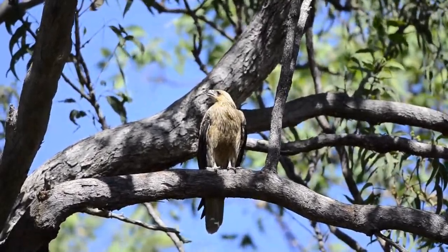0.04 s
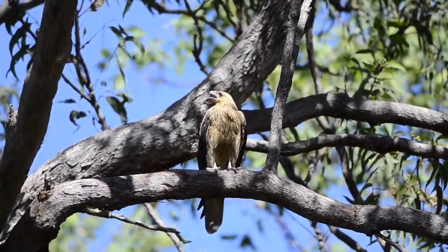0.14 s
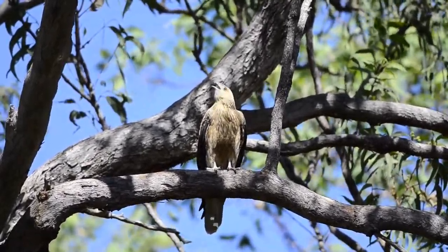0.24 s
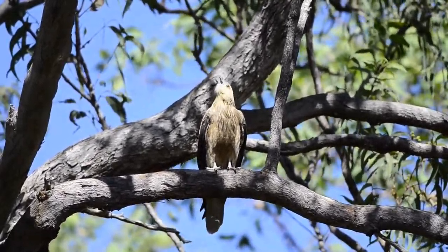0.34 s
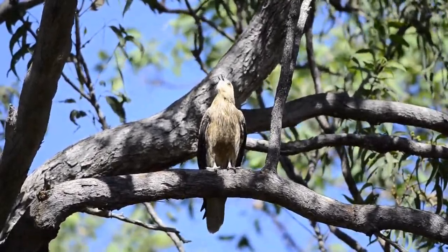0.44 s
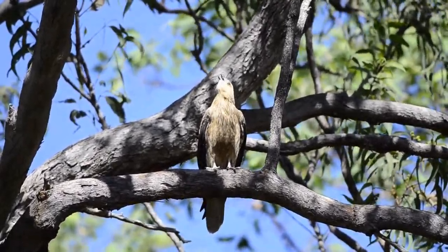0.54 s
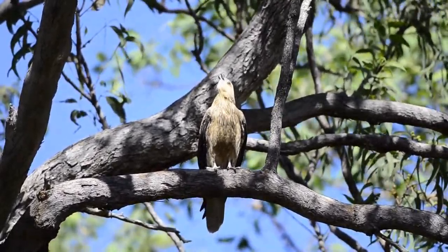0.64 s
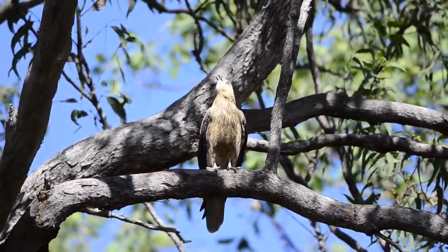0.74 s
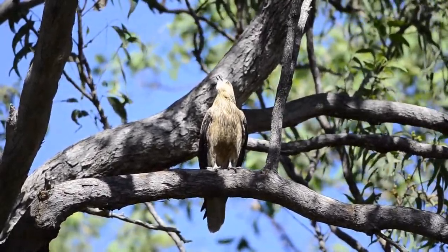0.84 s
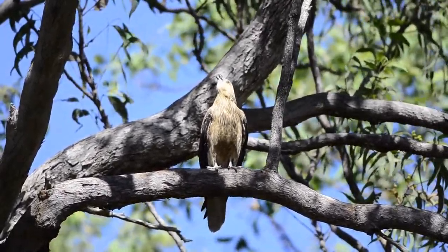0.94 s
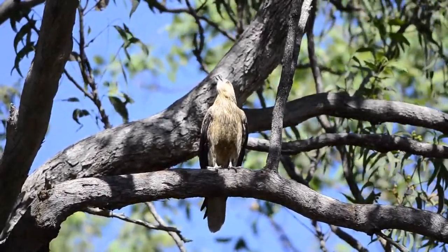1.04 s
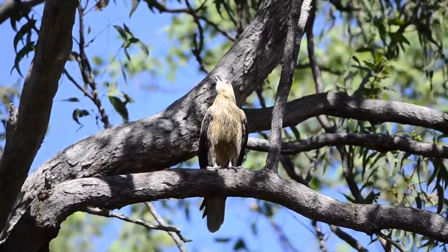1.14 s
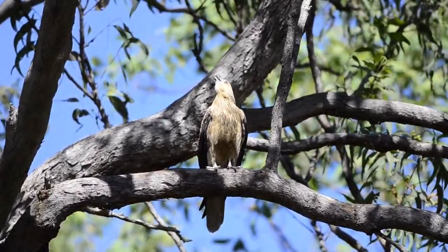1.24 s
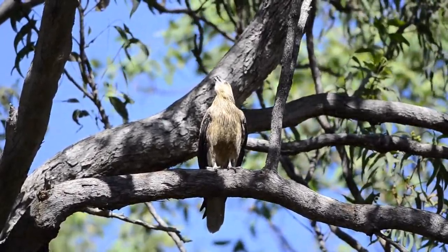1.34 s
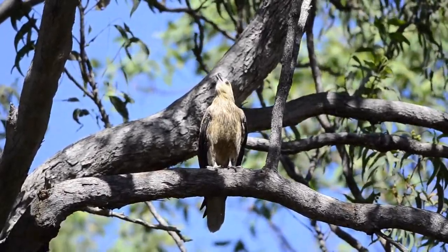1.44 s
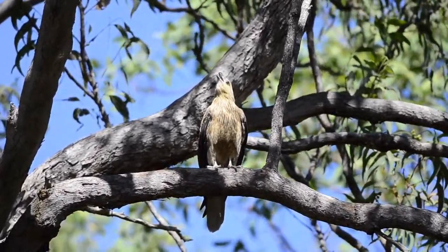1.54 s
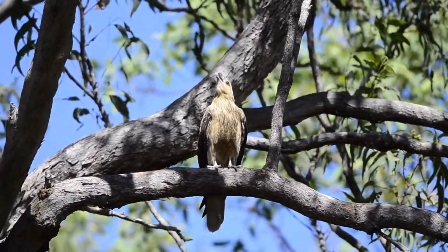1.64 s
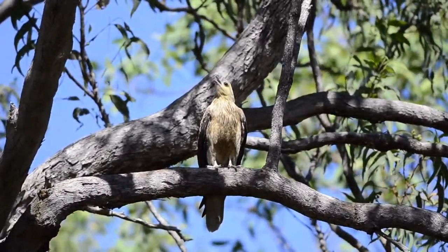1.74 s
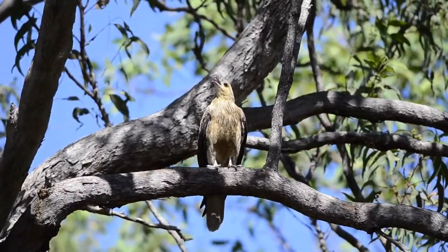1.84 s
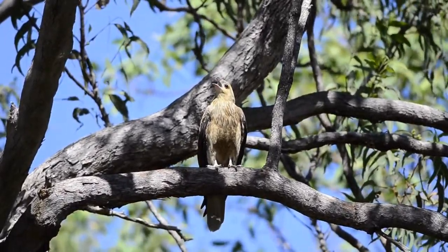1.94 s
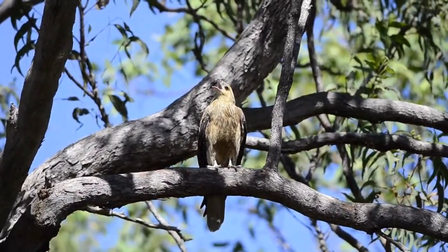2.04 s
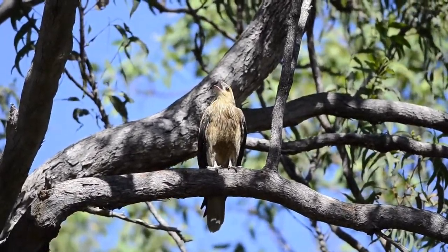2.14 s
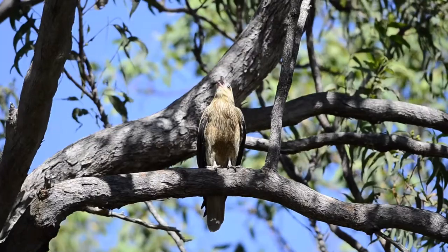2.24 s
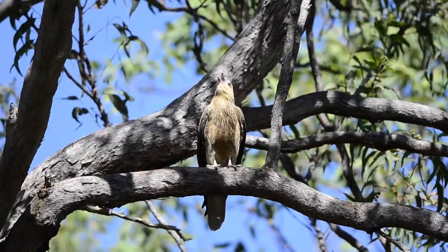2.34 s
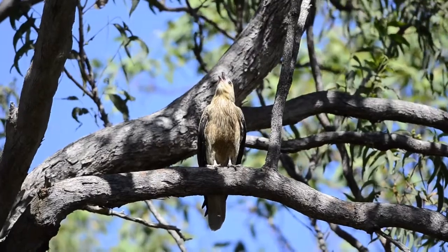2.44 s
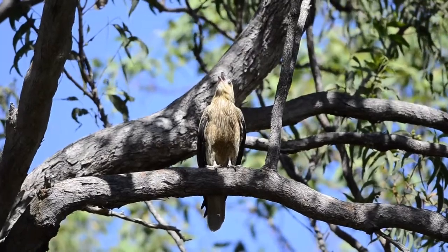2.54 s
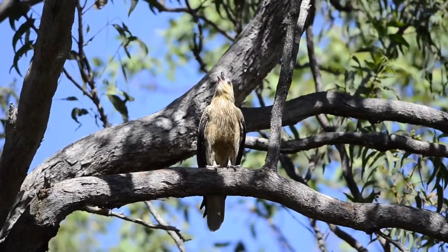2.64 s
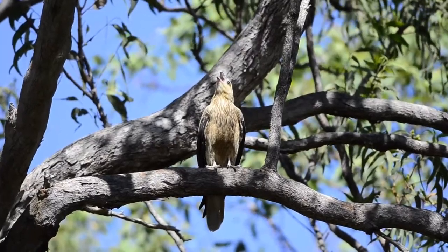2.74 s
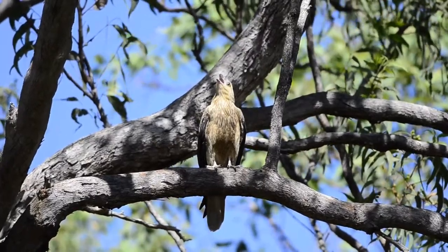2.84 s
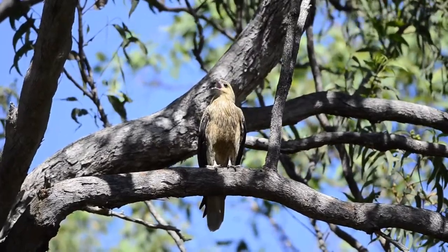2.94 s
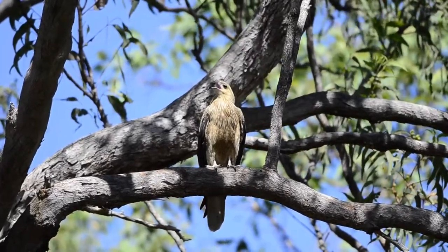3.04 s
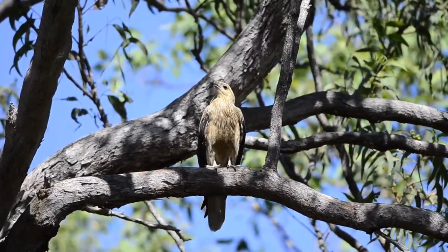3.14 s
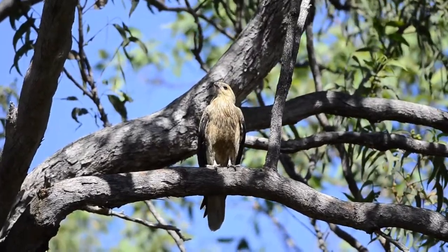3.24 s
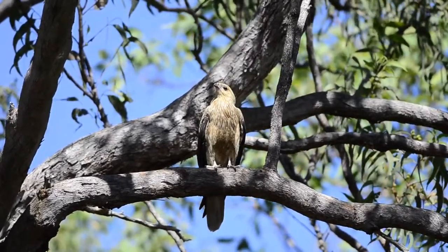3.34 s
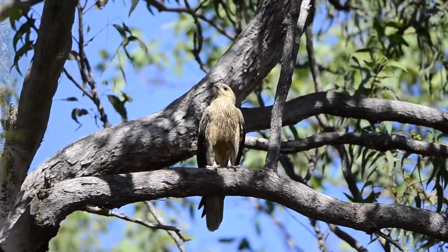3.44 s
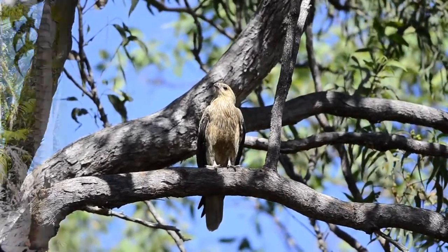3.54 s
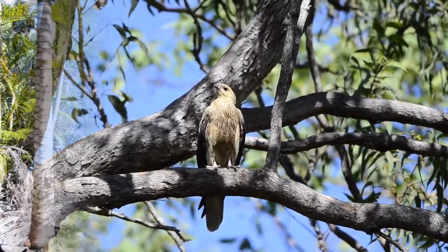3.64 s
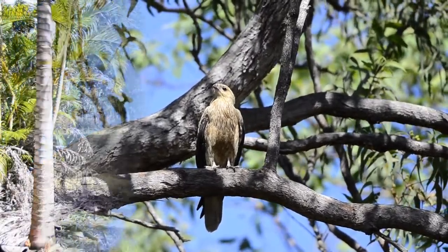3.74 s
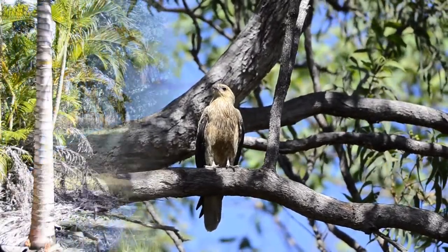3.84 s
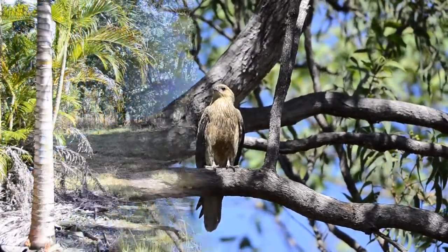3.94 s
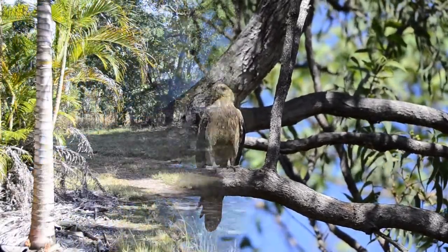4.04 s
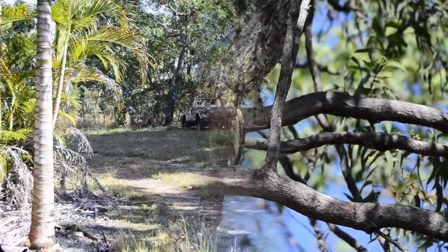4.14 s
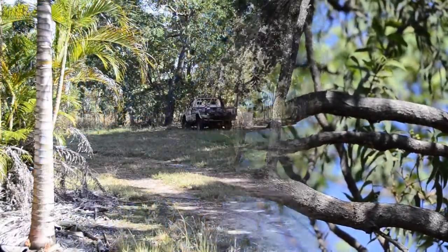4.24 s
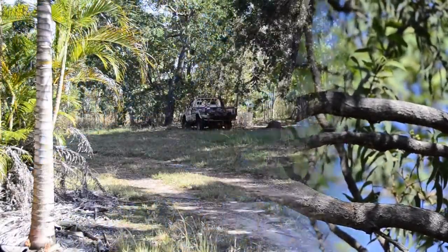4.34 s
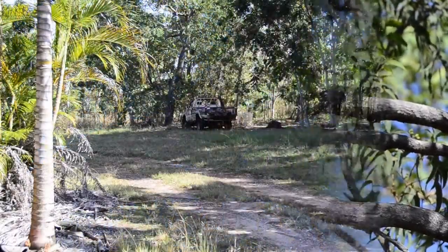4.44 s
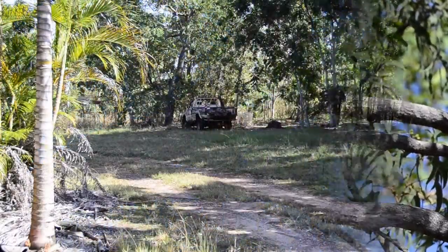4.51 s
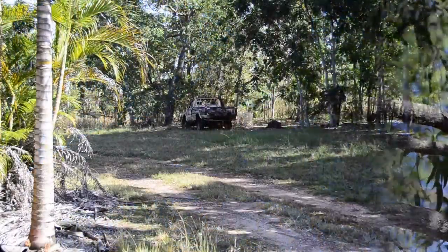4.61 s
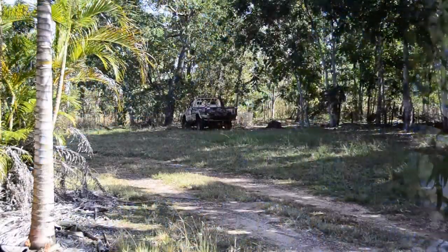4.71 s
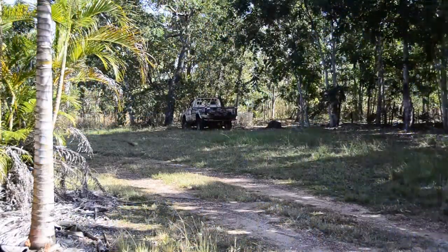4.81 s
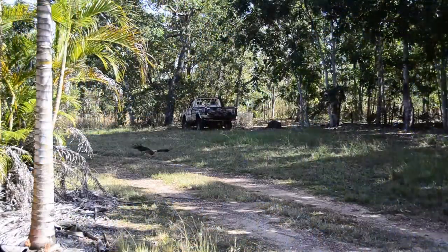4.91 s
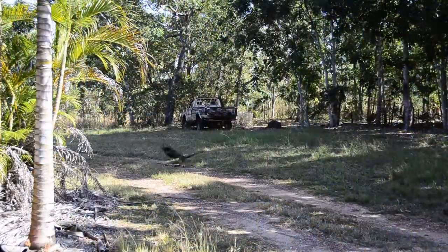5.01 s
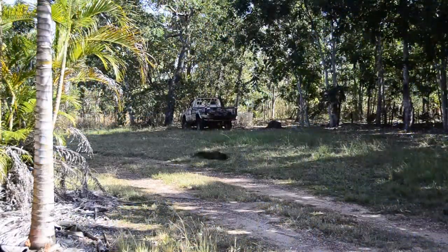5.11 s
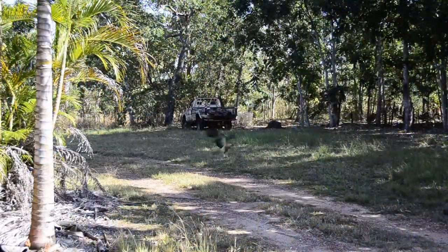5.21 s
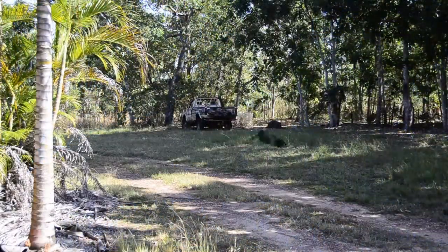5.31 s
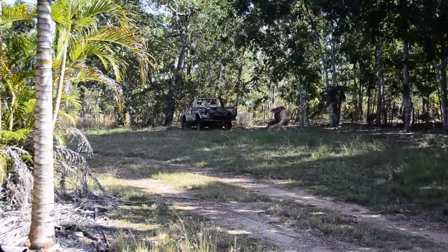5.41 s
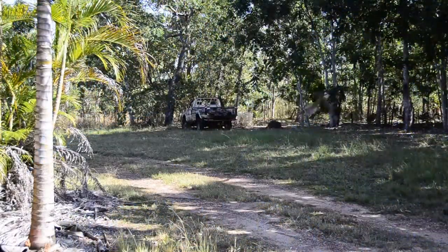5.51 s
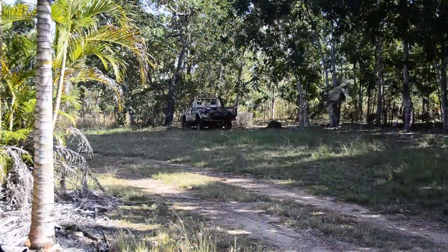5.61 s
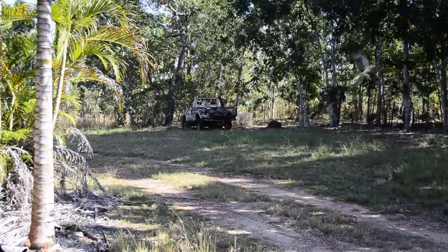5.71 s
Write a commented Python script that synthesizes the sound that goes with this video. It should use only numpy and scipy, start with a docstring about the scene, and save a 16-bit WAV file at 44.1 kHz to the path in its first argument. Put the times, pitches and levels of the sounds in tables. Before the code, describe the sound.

Over faint outdoor air and a high pulsing insect buzz, a bird of prey lets out a shrill descending whistle followed by short rising yelps, some cracked and rough. It repeats the pattern with a shorter whistle and a quicker run, clear in the foreground with a brief woodland echo. Then the bush goes quiet, leaving a few far bird notes, light snaps and softly stirring leaves.

```python
"""Faint moving air and a pulsing insect, and almost at once a whistling kite in a gum tree:
a long falling whistle, a run of short notes that climb, then a second whistle and run.
The two membranes of its syrinx rattle before they lock on a pitch and sometimes sound together,
beating into a rough tone; the woodland rings after every note. Late on come a few notes
from far birds, faint snaps and a rustle of leaves."""
import sys
import numpy as np
from scipy import signal
from scipy.fft import rfft, irfft, next_fast_len
from scipy.io import wavfile
from scipy.ndimage import map_coordinates

SR = 44100
rng = np.random.default_rng(int(sys.argv[2]) if len(sys.argv) > 2 else 0)


def materialize(psi):
    """Save the field psi as 16-bit PCM at rate SR to the path in sys.argv[1].

    A 1-D psi becomes a single channel; in a 2-D psi each row is a channel.
    """
    bounded = np.clip(np.atleast_2d(psi).T, -1, 1)
    quanta = np.round(bounded * 32767).astype(np.int16)
    wavfile.write(sys.argv[1], SR, quanta)


N = 254456
TIME = np.arange(N) / SR


def amp(db):
    """Decibels to gain."""
    return 10 ** (np.asarray(db) / 20)


def unit(x):
    """Scale to rms 1."""
    return x / np.sqrt(np.mean(x ** 2) + 1e-20)


def along(points, hz):
    """Read a curve of (f/Hz, value) points on a log frequency axis."""
    f, values = np.transpose(points)
    return np.interp(np.log(hz + 1), np.log(f + 1), values)


def curves(rows, at=TIME):
    """Each column after the first, read where the first equals `at`."""
    knots, *columns = np.transpose(rows)
    return [np.interp(at, knots, column) for column in columns]


def wobble(rate, t=TIME):
    """A smooth random modulator, `rate` knots a second, read at times t."""
    return map_coordinates(rng.standard_normal(int(N * rate / SR) + 4), [t * rate])


def filtered(x, response):
    """EQ x with a gain given as a function of frequency."""
    size = next_fast_len(N + SR // 2)
    return irfft(rfft(x, size) * response(np.fft.rfftfreq(size, 1 / SR)), size)[:N]


def noise(colour):
    """Noise of rms 1 with an (f/Hz, level/dB) spectrum."""
    return unit(filtered(rng.standard_normal(N), lambda hz: amp(along(colour, hz))))


def band(centre_hz, width_hz, order=2):
    """Noise of rms 1 in one narrow band."""
    white = rng.standard_normal(N)
    return unit(filtered(white, lambda hz: 1 / (1 + (2 * (hz - centre_hz) / width_hz) ** order)))


def gate(t, start, end, rise, fall):
    """A soft-edged gate, half open at start and at end."""
    return (1 + np.tanh((t - start) / rise)) * (1 - np.tanh((t - end) / fall)) / 4


def bump(t, centre, width):
    """A bell-shaped swell of height 1."""
    return np.exp(-((t - centre) / width) ** 2)


def span(start, end):
    """Sample indices of a note, with 10 ms handles on both sides."""
    return np.arange(max(int(start * SR) - SR // 100, 0), min(int(end * SR) + SR // 100, N))


# fader rides for the air, the leaf hiss and the drone: t/s, level/dB
AIR_RIDE = [(0, -57.3), (3.25, -56.5), (4.9, -61), (5.77, -60.5)]
HISS_RIDE = [(0, -75.5), (3.3, -76), (4.9, -78.5), (5.77, -74)]
DRONE_RIDE = [(0, -73), (.58, -64), (1.1, -68.5), (2.4, -75.5), (3.3, -65), (3.8, -65.5), (4.7, -65.5),
              (4.95, -72.5), (5.77, -77)]
# spectra of the air and the leaf hiss: f/Hz, level/dB
AIR_EQ = [(20, -14.5), (55, -8), (95, 2), (125, -5), (200, -1.5), (350, -2.5), (500, -1.5), (720, -1),
          (1200, -4.5), (2500, -7), (4000, -13), (6500, -17), (10000, -30), (15000, -68.5)]
HISS_EQ = [(500, -45), (2500, -6.5), (5000, 0.5), (8000, 4), (10000, -6), (12500, -11), (15000, -26.5)]


def bush_bed():
    """Distant moving air, a hiss of leaves and a far, fuzzy drone."""
    air = amp(curves(AIR_RIDE)[0] + 0.38 * wobble(7)) * noise(AIR_EQ)
    hiss = amp(curves(HISS_RIDE)[0]) * noise(HISS_EQ)
    drone = amp(curves(DRONE_RIDE)[0]) * band(367, 51)
    return air + hiss + drone


CHIRP_START_S, CHIRP_RATE_HZ, SPEEDUP_HZ_PER_S, CHIRP_WIDTH_S = .035, 6.63, .121, 0.05
INSECT_DB, INSECT_FADE_DB_PER_S, BUZZ_FLOOR = -63, 1, .13


def insect():
    """A thin buzz that swells about seven times a second, slowly speeding up and fading."""
    cycles = CHIRP_RATE_HZ * (TIME - CHIRP_START_S) + SPEEDUP_HZ_PER_S * TIME ** 2 / 2 + .03 * wobble(3)
    chirps = bump(cycles, np.round(cycles), CHIRP_WIDTH_S * CHIRP_RATE_HZ)
    swell = BUZZ_FLOOR + amp(0.95 * wobble(6.5)) * chirps
    buzz = band(7400, 760, order=4) * amp(1.5 * wobble(90))
    return amp(INSECT_DB - INSECT_FADE_DB_PER_S * TIME) * swell * buzz


# pitchless rasps that close each phrase: t/s, length/s, level/dB
CLOSING_RASPS = [(0.981, 0.056, -46.5), (3.158, 0.021, -43.5)]
# spectrum of the rattle: f/Hz, level/dB
RASP_EQ = [(500, -40), (1300, -19), (1650, -3), (2200, 0), (2900, -5), (3500, -17), (4500, -24),
           (7000, -28), (10000, -38), (15000, -62)]


def rasps(overlap_s=0.006):
    """The kite's membranes rattle before they lock on a pitch, and again as a phrase ends."""
    notes = WHISTLE_CUES + YELP_CUES + CRACKED_CUES
    bursts = [(s - lead, lead + overlap_s, db) for s, *_, lead, db in notes] + CLOSING_RASPS
    envelope = sum(amp(db) * gate(TIME, s, s + length, 0.0025, 0.0037) for s, length, db in bursts)
    return envelope * unit(noise(RASP_EQ) * amp(wobble(400)))


# the throat's colouring of harmonics 3 to 8: f/Hz, gain/dB
THROAT_EQ = [(4000, -9), (5000, -12), (6300, 8.5), (7300, 0.5), (8800, -6), (10200, -13), (12500, -27),
             (15000, -48.5)]
SECOND_VOICE_RATIO, BEAT_AM_POWER = .775, 0.058
DIFFERENCE_TONE_DB, SUM_TONE_DB, SLAP_DB = -27, -17, 11


def syrinx(pitch_hz, octave_db, upper_db, second_db, waver, grit, even_db, step_db=-1.0):
    """Two membranes share one airflow: their beating bends the wave and adds sum and difference tones."""
    phase = 2 * np.pi * np.cumsum(pitch_hz) / SR
    beat = 2 * np.pi * np.cumsum(pitch_hz * (1 - SECOND_VOICE_RATIO * (1 + waver))) / SR
    second = np.minimum(amp(second_db), .65)
    swing = 1 + second * np.exp(-1j * beat)
    bend = np.angle(swing)
    wave = np.sin(phase + bend) + amp(octave_db) * np.sin(2 * (phase + bend) + grit / 2)
    wave += amp(DIFFERENCE_TONE_DB) * second * (np.cos(beat) + np.cos(2 * beat))
    wave += amp(SUM_TONE_DB) * second * np.cos(2 * phase - beat)
    for k in range(3, 9):
        db = upper_db + along(THROAT_EQ, k * pitch_hz) + even_db * (k % 2 == 0) + step_db * (k - 3)
        db += SLAP_DB * second * (k > 3)  # beating membranes slap and brighten the top
        smear = np.sqrt(k - 2) * grit  # turbulence blurs each higher harmonic more
        wave += amp(db) * (k * pitch_hz < SR / 2) * np.sin(k * phase + 2 * bend + smear)
    return np.sqrt(2) * np.abs(swing) ** BEAT_AM_POWER * wave


# timbre of the low register by pitch: f/Hz, octave/dB, upper harmonics/dB
LOW_TIMBRE = [(1880, -14, -25.5), (2160, -13, -34), (2294, -5, -22.5), (2630, -7, -18), (3050, -6.5, -19)]
PURE_DB = -45.5  # the second voice barely sounds in this register


def scoop(s, length, hz, db):
    """The upward glide in the low register that leads into a jump."""
    return s, length, .865 * hz, hz, 1.06 * hz, db, *curves(LOW_TIMBRE, hz), PURE_DB


def short_notes(glides):
    """Voice each glide as a small arch of pitch; it grows rough when the second voice joins."""
    out = np.zeros(N)
    tremble, waver = wobble(500), 0.019 * wobble(350)
    flutter_db, grit = 2.83 * wobble(180), 1.16 * wobble(1500)
    for s, length, start_hz, middle_hz, end_hz, db, octave_db, upper_db, second_db in glides:
        i = span(s, s + length)
        u = np.clip((TIME[i] - s) / length, 0, 1)
        arch = start_hz + (end_hz - start_hz) * u + 2 * u * (1 - u) * (2 * middle_hz - start_hz - end_hz)
        pitch = arch * (1 + (.006 + .005 * amp(second_db)) * tremble[i])
        strain = np.interp(arch, [1700, 2300, 3200], [.2, .32, .6])
        # more pressure makes the note both higher and louder; it dulls as the pressure runs out
        swell_db = 1.5 * (np.sin(np.pi * u) - .7) + 16 * np.log2(arch / middle_hz)
        bright_db = 2 - 7 * u ** 2
        tone = syrinx(pitch, octave_db + bright_db / 2, upper_db + bright_db, second_db,
                      waver[i], strain * grit[i], even_db=-2.5)
        out[i] += tone * amp(db + swell_db + flutter_db[i]) * gate(TIME[i], s, s + length, 0.004, 0.002)
    return out


# timbre of the high register by pitch: f/Hz, octave/dB, upper harmonics/dB
HIGH_TIMBRE = [(2080, -32, -33), (2376, -29, -19.5), (2620, -22, -21), (2770, -14, -18.5),
               (3370, -16.5, -36.5)]
# long whistles: t/s, scoop length/s, scoop f/Hz, scoop level/dB, length/s, held f/Hz, drop/Hz, drop/s,
# sag/(Hz/s), last droop/Hz, held level/dB, octave trim/dB, even harmonics/dB, second voice/dB,
# rasp lead/s, rasp level/dB
WHISTLE_CUES = [(.246, .035, 3020, -24.5, .346, 2615, 959.5, .03, 1618, 17, -31, -5.5, -19, -30, 0.0044, -35),
                (2.25, .022, 2694, -27.5, .397, 2623, 650, .046, 419.6, 260, -30.5, -1.5, -3.5, -19, 0.0072, -46.5)]
DROP_STEEPNESS, DROOP_S = 2.6, .022
ACCENT_DB, ACCENT_AT_S, ACCENT_WIDTH_S = 11, 0.017, 0.024
FLARE_DB, FLARE_AT_S, FLARE_WIDTH_S, EBB_DB, EBB_WIDTH_S = -10.5, .058, 0.019, -16.5, 0.041


def whistles():
    """Long slides in the high register: an accent, a fast drop, then a trembling hold that sinks."""
    out = np.zeros(N)
    tremble, flutter_db = wobble(260), 0.99 * wobble(45)
    waver, grit = 0.0079 * wobble(300), wobble(1200)
    for (s, scoop_s, _, _, length, held_hz, drop_hz, drop_s, sag, droop_hz,
         held_db, octave_trim_db, even_db, second_db, _, _) in WHISTLE_CUES:
        start = s + scoop_s
        i = span(start, start + length)
        age = np.clip(TIME[i] - start, 0, length)
        drop = drop_hz / (1 + (age / drop_s) ** DROP_STEEPNESS)
        droop = droop_hz * np.exp((age - length) / DROOP_S)
        slide = held_hz + drop - sag * age - droop
        octave_db, upper_db = curves(HIGH_TIMBRE, slide)
        db = held_db + ACCENT_DB * bump(age, ACCENT_AT_S, ACCENT_WIDTH_S) + flutter_db[i]
        # the second voice flares as the accent fades, and again as the air runs out
        second = amp(second_db) + amp(FLARE_DB) * bump(age, FLARE_AT_S, FLARE_WIDTH_S)
        second += amp(EBB_DB) * bump(age, length, EBB_WIDTH_S)
        strain = np.interp(slide, [1700, 2500, 3400], [.1, .35, 1.3])
        pitch = slide * (1 + 0.0033 * (1 + strain) * tremble[i])
        tone = syrinx(pitch, octave_db + octave_trim_db, upper_db, 20 * np.log10(second),
                      waver[i], strain * grit[i], even_db)
        out[i] += tone * amp(db) * gate(TIME[i], start, start + length, 0.0012, 0.0049)
    return out


# the woodland's reverb time: f/Hz, t60/s
REVERB_DECAY = [(1600, .5), (2600, .75), (5000, .7), (8000, .55), (14000, .35)]
# its return level: f/Hz, level/dB
REVERB_EQ = [(1650, -8.5), (1850, 0.5), (2150, -0.5), (3000, -2.5), (3800, -3.5), (5000, -2), (8000, -2),
             (13000, -3)]


def woodland(call, fade_in_s=0.0018, early_db=4, early_s=0.043):
    """Near boughs scatter dense early reflections, farther trunks a longer tail."""
    hz, t, spectra = signal.stft(rng.standard_normal((6, SR)), SR, nperseg=256)
    shape = amp(-60 * t / along(REVERB_DECAY, hz)[:, None]) * (1 + amp(early_db) * np.exp(-t / early_s))
    shape *= amp(along(REVERB_EQ, hz))[:, None] / np.sqrt(SR * np.mean(shape ** 2, axis=1, keepdims=True))
    fade_in = np.clip(TIME[:SR] / fade_in_s, 0, 1) ** 2
    tails = signal.istft(spectra * shape, SR, nperseg=256)[1][:, :SR] * fade_in
    # the bird turns its head, so the call crossfades from one set of paths to the next
    turn = np.interp(TIME, [.2, 3.2], [0, len(tails) - 1])
    sends = (call * np.cos(np.pi / 2 * np.clip(turn - k, -1, 1)) for k in range(len(tails)))
    return sum(signal.fftconvolve(send, tail)[:N] for send, tail in zip(sends, tails))


HOLD_END_S, HOLD_HZ, HOLD_SINK_HZ = 0.97, 1661, 68
HOLD_DB, HOLD_RISE_S, HOLD_FADE_DB = -33, 0.028, 7.5
HOLD_OCTAVE_DB, HOLD_UPPER_DB = -53.5, -66.5  # the overtones do not follow the swell and fade


def low_whistle():
    """The first whistle falls into the low register: a nearly pure, sinking tone over a soft sizzle."""
    s, scoop_s, _, _, length, *_ = WHISTLE_CUES[0]
    start = s + scoop_s + length
    i = span(start, HOLD_END_S)
    t = TIME[i]
    age = np.maximum(t - start, 0)
    u = age / (HOLD_END_S - start)
    db = HOLD_DB - 6 * np.exp(-age / HOLD_RISE_S) - HOLD_FADE_DB * u ** 5
    pitch = (HOLD_HZ - HOLD_SINK_HZ * u ** 2) * (1 + .0012 * wobble(260, t))
    tone = syrinx(pitch, HOLD_OCTAVE_DB - db, HOLD_UPPER_DB - db, PURE_DB,
                  waver=.0073 * wobble(300, t), grit=.1 * wobble(1200, t), even_db=-1.2, step_db=-3.5)
    sizzle = amp(-54) * band(2220, 360, order=4)[i]
    flutter_db = .5 * wobble(45, t)
    out = np.zeros(N)
    out[i] = (tone * amp(db + flutter_db) + sizzle) * gate(t, start, HOLD_END_S, .001, .0037)
    return out


# clean yelps: t/s, length/s, f/Hz, droop/fraction, level/dB, brightness/dB, rasp lead/s, rasp level/dB
YELP_CUES = [(1.236, 0.085, 1807, 0.1, -36, 2, 0.011, -38), (1.406, 0.075, 1836, 0.12, -33, -1, 0.017, -41),
             (2.049, 0.067, 2278, 0.14, -34.5, 3.5, .012, -41.5),
             (2.165, .058, 2558, .18, -28.5, 0.5, 0.0084, -42.5),
             (3.069, 0.045, 2648, .21, -28, -0.5, 0.0051, -41.5)]


def yelps():
    """Glides that stay in the low register, each one arch that ends lower than it starts."""
    for s, length, hz, droop, db, bright_db, _, _ in YELP_CUES:
        octave_db, upper_db = curves(LOW_TIMBRE, hz)
        arch_hz = hz * (1 - 0.456 * droop), hz, hz * (1 - droop)
        yield s, length, *arch_hz, db, octave_db + bright_db / 2, upper_db + bright_db, PURE_DB


# cracked notes: t/s, scoop/s, hold/s, low f/Hz, high f/Hz, sag/fraction, low level/dB, high level/dB,
# second voice/dB, rasp lead/s, rasp level/dB
CRACKED_CUES = [(1.593, 0.02, 0.048, 1874, 2236, 0.07, -29.5, -32.5, -4.5, .012, -38.5),
                (1.754, 0.018, 0.06, 1916, 2380, 0.08, -32, -32, -5, 0.0098, -41),
                (1.909, .021, 0.047, 2146, 2587, 0.05, -29, -29.5, -7.5, 0.0054, -38.5),
                (2.669, 0.024, .039, 1880, 2439, 0.09, -33.5, -30.5, -11, 0.0079, -50),
                (2.773, .018, .03, 2068, 2543, .12, -33.5, -32.5, -18, 0.0077, -41),
                (2.873, 0.027, 0.017, 2267, 2734, .14, -33.5, -27, -13, 0.009, -40.5),
                (2.97, 0.026, 0.01796, 2525, 3044, .175, -31, -24.5, -17, 0.004, -44)]


def cracked_notes(bow=0.0338, octave_trim_db=3.5, upper_trim_db=-2):
    """Pairs of glides: the voice scoops up, then jumps to the high register and sags along a curve."""
    for s, scoop_s, hold_s, low_hz, high_hz, sag, low_db, high_db, second_db, _, _ in CRACKED_CUES:
        yield scoop(s, scoop_s, low_hz, low_db)
        middle_hz = high_hz * (1 - sag / 2 + bow)
        octave_db, upper_db = curves(HIGH_TIMBRE, middle_hz)
        yield (s + scoop_s, hold_s, high_hz, middle_hz, high_hz * (1 - sag), high_db,
               octave_db + octave_trim_db, upper_db + upper_trim_db, second_db)


# far birds' faint notes: t/s, length/s, f/Hz, level/dB
FAR_BIRD_CUES = [(3.768, .04, 3920, -64.5), (5.55, 0.025, 2200, -65), (5.588, 0.04, 646, -60),
                 (5.632, 0.049, 800, -64)]


def far_birds():
    """Distance blurs each note into a narrow band of noise."""
    return sum(amp(db) * gate(TIME, s, s + length, 0.0046, .01) * band(hz, 0.12 * hz, order=4)
               for s, length, hz, db in FAR_BIRD_CUES)


# peaks of the rustle: t/s, level/dB
SWISH_CUES = [(5.11, -59), (5.29, -64.5), (5.52, -64.5), (5.76, -66)]


def rustle(rise_s=0.03, fall_s=0.095):
    """Leaves stir in soft swishes, each with a quick attack and a slower release."""
    stir = sum(amp(db) * np.exp(np.minimum((TIME - s) / rise_s, (s - TIME) / fall_s))
               for s, db in SWISH_CUES)
    leaves = noise([(250, -21), (600, 3), (1500, 1), (5000, 0.5), (9500, -3.5), (12000, -16), (15000, -22)])
    return stir * leaves


# snaps and ticks among the leaves: t/s, level before trim/dB, low-pass f/Hz, t60/s, echo/dB
SNAP_CUES = [(5.092, -55.5, 9800, 0.016, 1.5), (5.15, -67, 5030, .015, -16), (5.186, -63, 5500, .012, -12),
             (5.365, -47, 5470, 0.035, -11), (5.38, -53, 3000, 0.044, -21)]


def snaps(trim_db=2, echo_t60_s=0.22):
    """Dry cracks with a short echo; distance takes the top off each."""
    out = np.zeros(N)
    for s, db, cutoff_hz, t60, echo_db in SNAP_CUES:
        age = np.maximum(TIME - s, 0)
        grain = noise([(150, -14), (500, -1), (1800, -6), (6000, -8.5), (15000, -13)])
        crack = grain * (TIME >= s) * (amp(-60 * age / t60) + amp(echo_db - 60 * age / echo_t60_s))
        low_pass = signal.butter(4, cutoff_hz, fs=SR, output="sos")
        out += amp(db + trim_db) * signal.sosfilt(low_pass, crack)
    return out


# what leaves the open beak and carries through the air: f/Hz, gain/dB
BEAK_EQ = [(600, -4), (1500, -0.5), (10300, 0), (11300, -3.5), (15000, -1.5)]


def scene():
    """The kite and its reverb over the quiet bush, in mono."""
    whistle_scoops = [scoop(*cue[:4]) for cue in WHISTLE_CUES]
    glides = [*whistle_scoops, *yelps(), *cracked_notes()]
    voice = whistles() + low_whistle() + short_notes(glides) + rasps()
    kite = filtered(voice, lambda hz: amp(along(BEAK_EQ, hz)))
    return (kite + woodland(kite) + bush_bed() + insect() + far_birds() + rustle() + snaps())[None]


# dips in the microphone's response: f/Hz, half-width/Hz, gain/dB
MIC_NOTCHES = [(5704, 270, -9.5), (7170, 38, -3)]


def record(dry, top_hz=15700):
    """The microphone has two narrow dips in its treble, and nothing passes above the band limit."""
    def response(hz):
        dips_db = sum(db / (1 + ((hz - centre) / width) ** 2) for centre, width, db in MIC_NOTCHES)
        return amp(dips_db) * (hz < top_hz)
    return filtered(dry[0], response)[None]


dry = scene()
out = record(dry)
materialize(out)
```